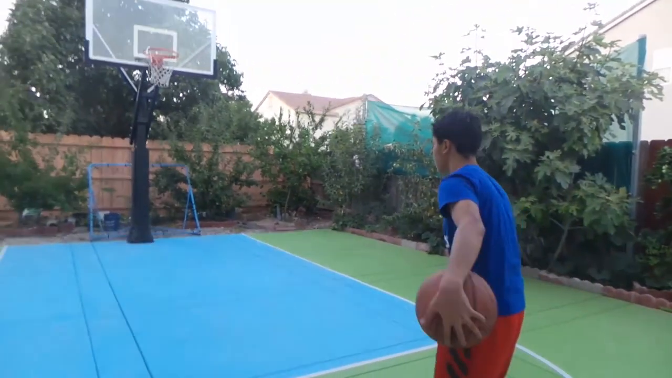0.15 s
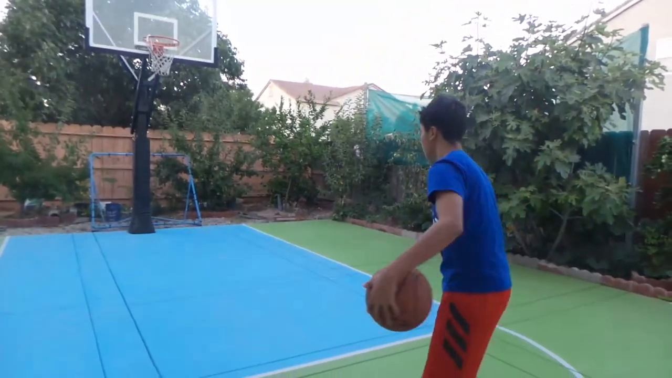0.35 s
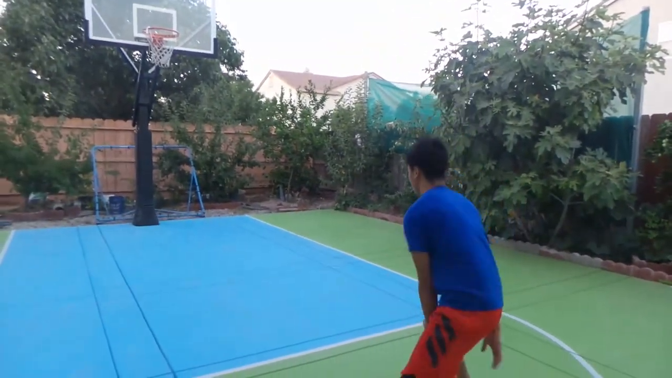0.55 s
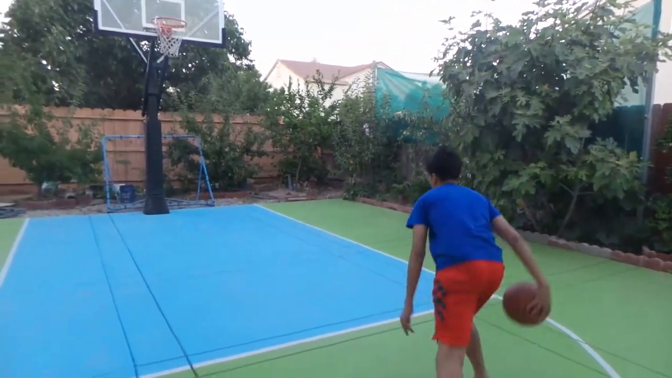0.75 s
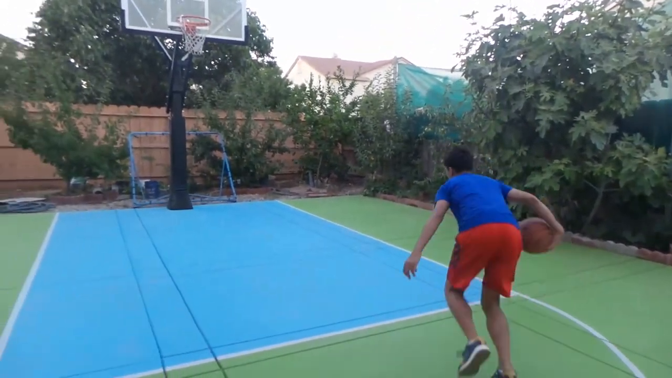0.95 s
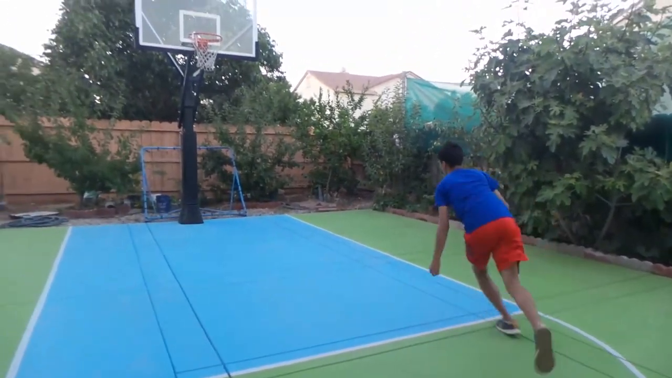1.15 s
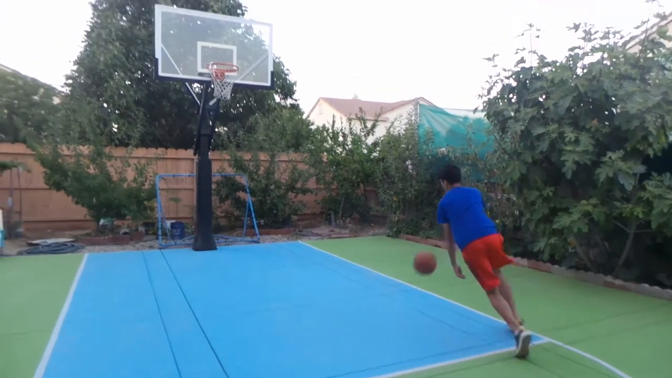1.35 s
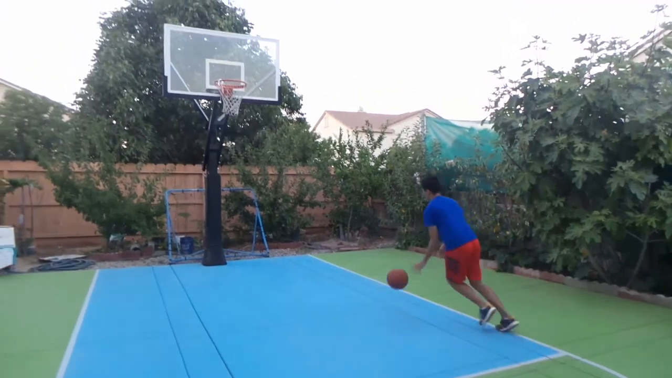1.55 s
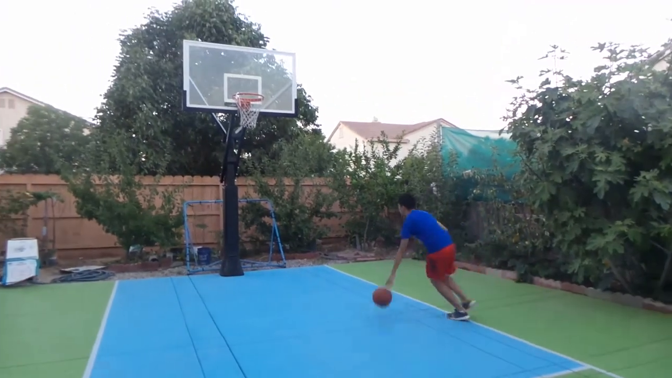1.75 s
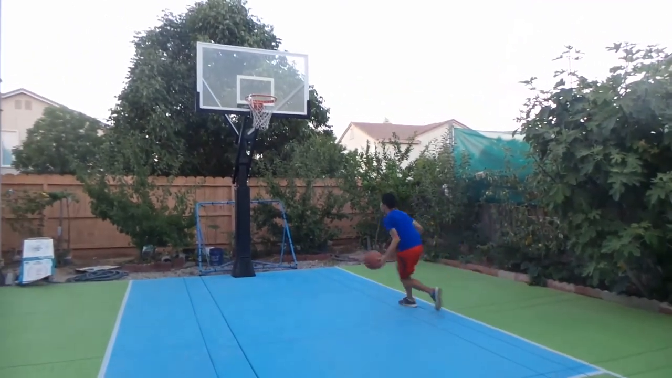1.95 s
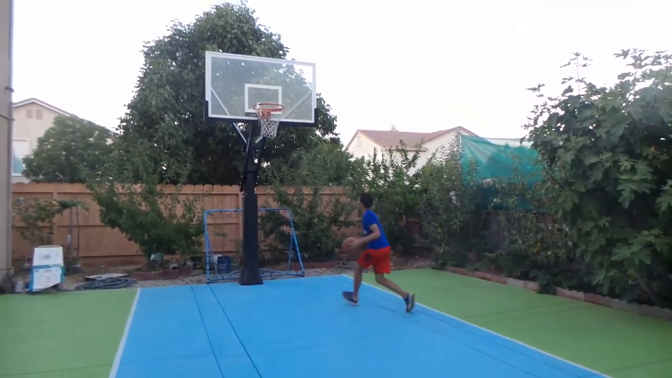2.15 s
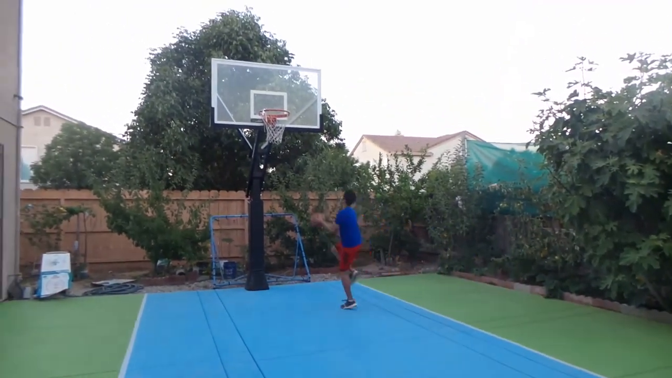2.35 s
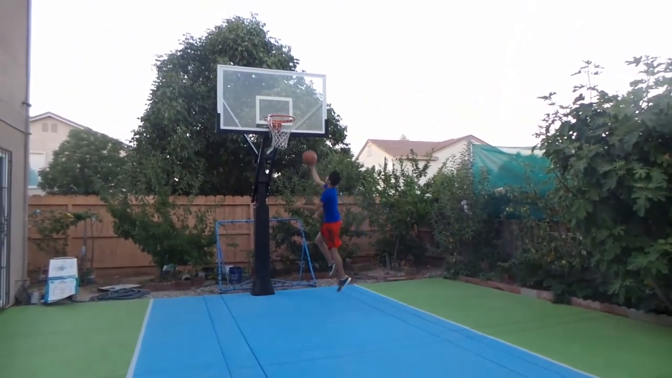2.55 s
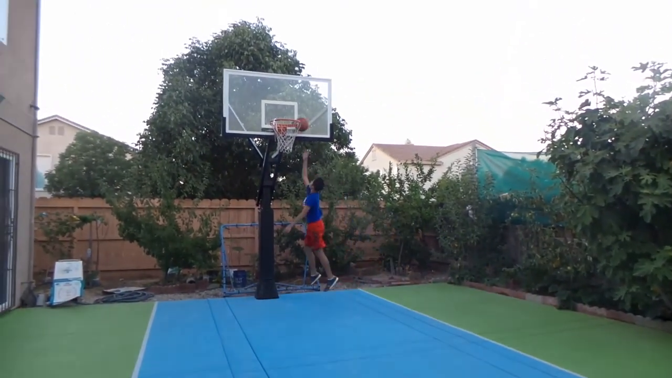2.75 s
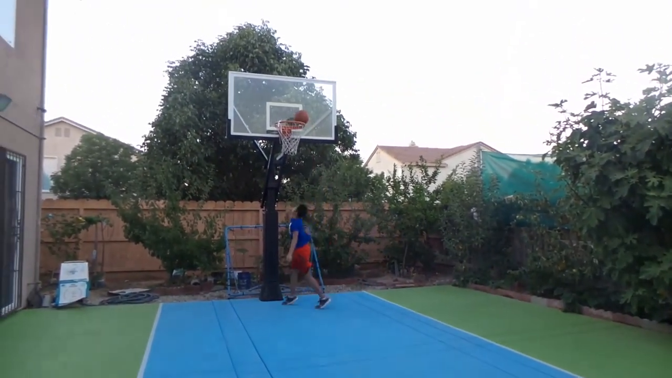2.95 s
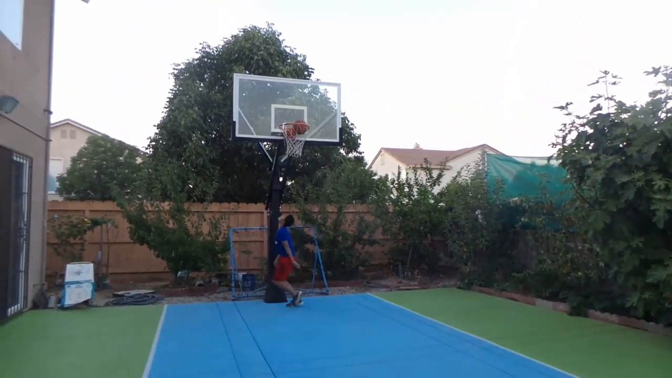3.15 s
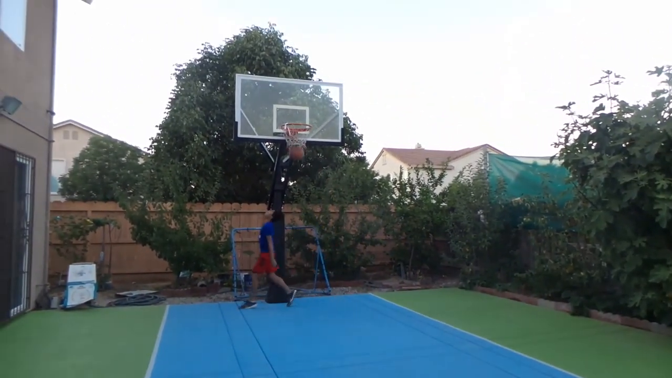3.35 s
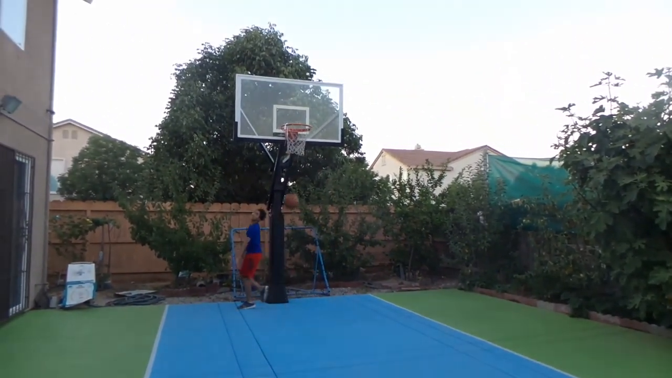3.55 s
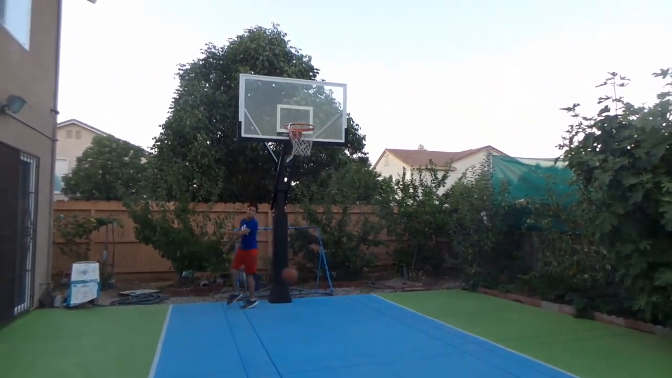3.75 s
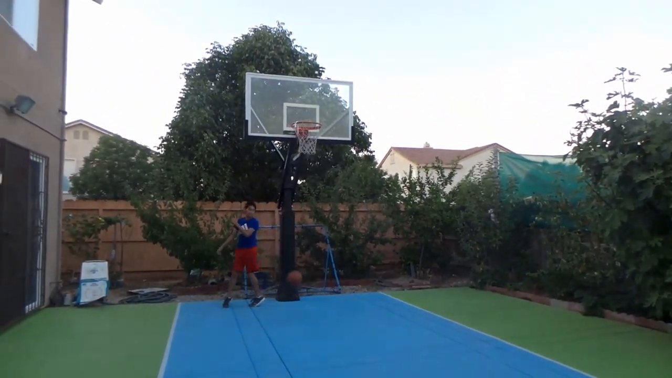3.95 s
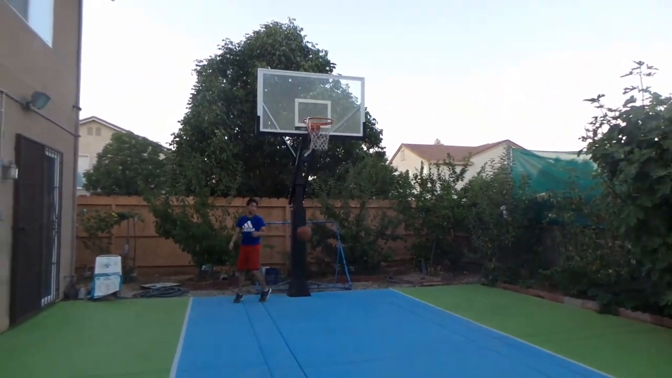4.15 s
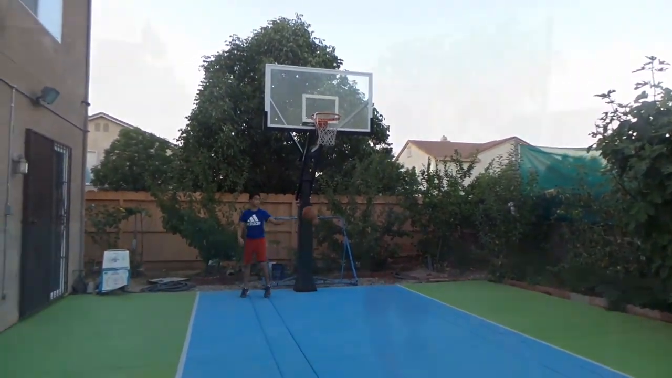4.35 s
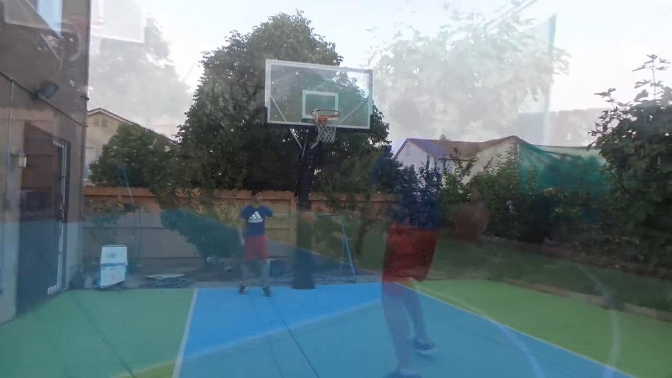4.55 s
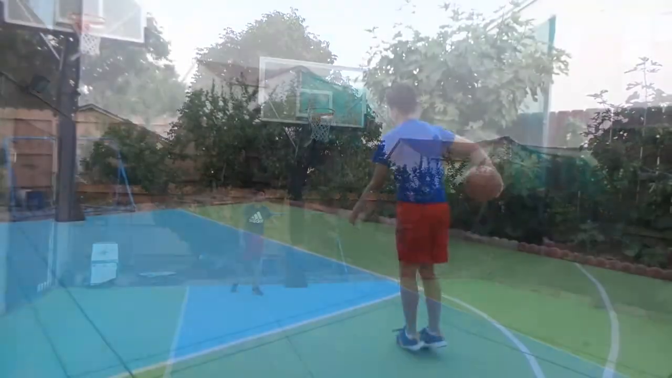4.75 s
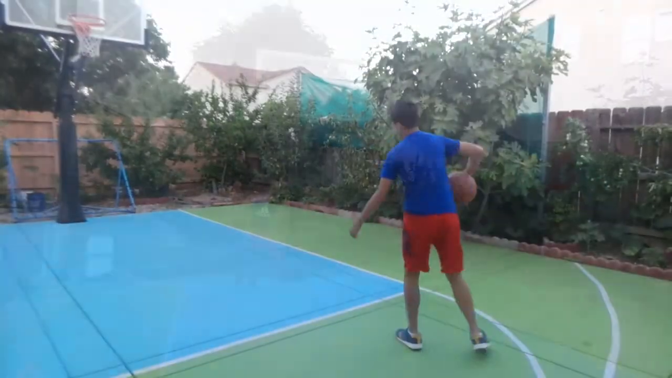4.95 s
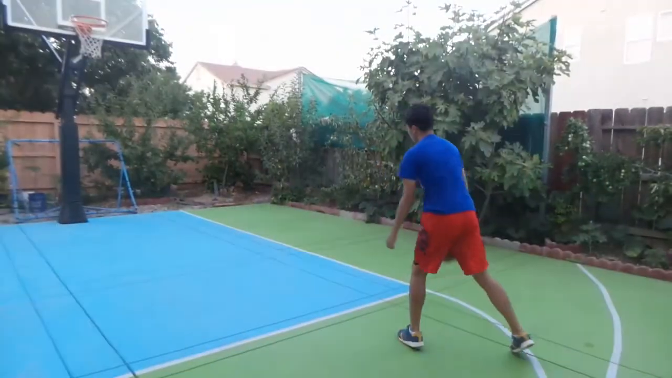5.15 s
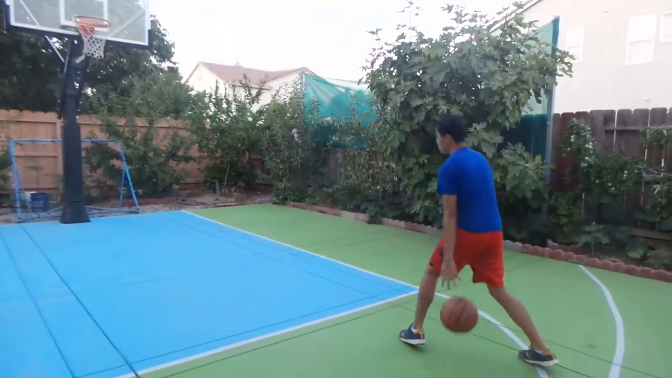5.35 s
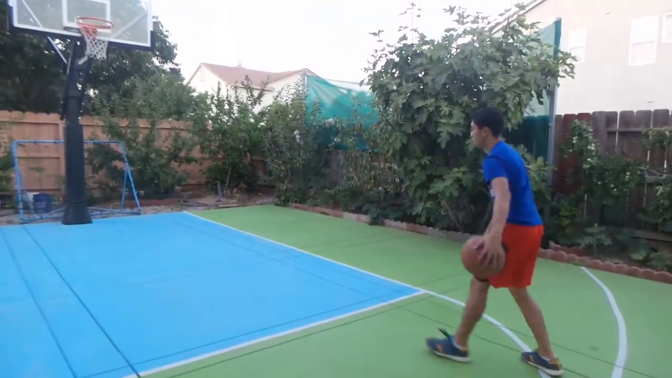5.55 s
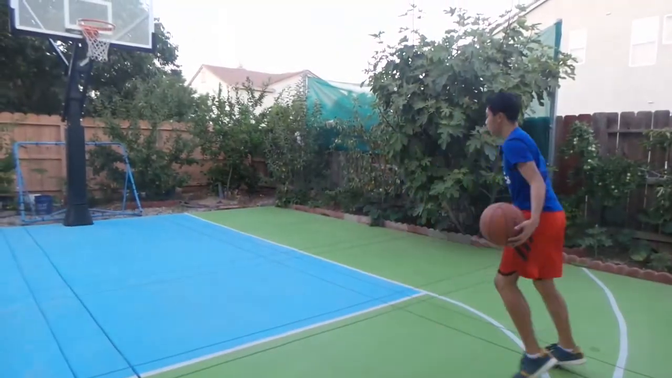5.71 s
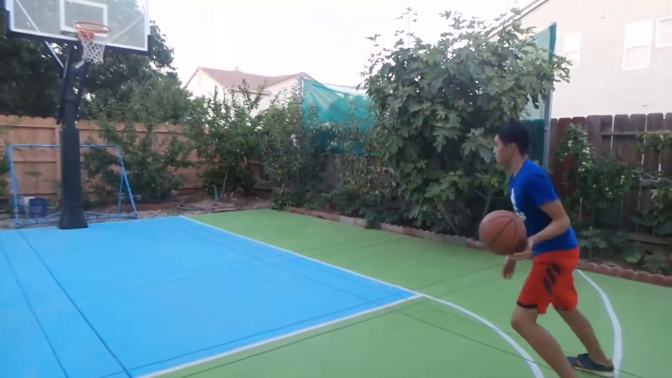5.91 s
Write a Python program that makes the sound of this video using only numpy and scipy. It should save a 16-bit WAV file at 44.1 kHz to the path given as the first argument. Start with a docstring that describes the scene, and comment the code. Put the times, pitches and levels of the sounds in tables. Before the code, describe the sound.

In a walled backyard, a palm slaps a basketball and a shoe scuffs, then three strong ringing bounces land unevenly among footsteps. A faint hoop rattle follows as a far car passes, then the ball drops with a crack and bounces weakly. Dribbling resumes with a moderate bounce and a very loud close one under a thin, high whistle. Traffic rumble and hiss continue on a small, nearly mono microphone.

```python
"""Suburban rumble, traffic and hiss, filtered noises, run throughout; blurred far whines come and go over them.
A palm slap and a shoe scuff open the dribbling on a concrete backyard court: each bounce is a crack, a thump,
a shell ring, a slap, grit and the ring of the air inside, returned by house wall and fences. Shoes land, one tick
follows a bounce, a far car goes by while the lay-up rattles on the hoop, the ball bounces on and is dribbled
again, and a thin whistle arches near the end. A small, nearly mono microphone listens."""
import sys
import numpy as np
from scipy import signal
from scipy.fft import rfft, irfft
from scipy.io import wavfile
from scipy.ndimage import uniform_filter1d

SR = 44100
rng = np.random.default_rng(int(sys.argv[2]) if len(sys.argv) > 2 else 0)


def transcribe(signal):
    """Save signal, clipped to [-1, 1], as a 16-bit WAV file at the path in sys.argv[1]."""
    frames = np.atleast_2d(signal).T
    limited = np.clip(frames, -1, 1)
    pcm = np.round(limited * 32767).astype(np.int16)
    wavfile.write(sys.argv[1], SR, pcm)


N = 268128  # samples in the scene


def undb(db):
    """Logarithmic level: decibels become an amplitude gain."""
    return 10 ** (np.asarray(db) / 20)


def clock(seconds):
    """Uniform sampling: times in seconds, from zero."""
    return np.arange(int(seconds * SR)) / SR


def unit(x):
    """Normalisation: scale to an rms of 1."""
    return x / np.sqrt(np.mean(x ** 2))


def bin_hz(size):
    """Discrete spectrum: bin frequencies, raised by 1 Hz to keep clear of zero."""
    return np.fft.rfftfreq(size, 1 / SR) + 1


def colour(x, points):
    """Spectral shaping: weight a noise by (Hz, dB) points joined on a log frequency axis, at rms 1."""
    hz, db = np.transpose(points)
    gain = undb(np.interp(np.log(bin_hz(len(x))), np.log(hz), db))
    return unit(irfft(rfft(x) * gain, len(x)))


def resonant(size, hz, q):
    """Simple resonance: noise through one tuned response of quality q, at rms 1."""
    f = bin_hz(size)
    response = 1 / (1 + 1j * q * (f / hz - hz / f))
    return unit(irfft(rfft(rng.standard_normal(size)) * response, size))


def butter(x, hz, kind, order):
    """Maximally flat filtering: a plain high-pass or low-pass."""
    return signal.sosfilt(signal.butter(order, hz, kind, fs=SR, output="sos"), x)


def fade(t, t60):
    """Exponential decay: a fall of 60 dB in t60 seconds."""
    return np.exp(-np.log(1000) * t / t60)


def ring(t, modes, detune):
    """Modal superposition: decaying sines, each slightly retuned at random on every blow."""
    out = 0
    for hz, db, t60 in modes:
        mode_hz = hz * (1 + detune * rng.standard_normal())
        out = out + undb(db) * fade(t, t60) * np.sin(2 * np.pi * mode_hz * t)
    return out


def walk(rate):
    """Slow random fluctuation: smoothed random steps, rate per second, with a spread near 1."""
    hold = int(SR / rate)
    steps = np.repeat(rng.standard_normal(N // hold + 1), hold)
    return 1.2 * uniform_filter1d(steps, hold)[:N]


def swell(peak_s, half_s):
    """Gaussian envelope: a smooth rise to 1 and fall, at 1/e after half_s."""
    return np.exp(-((np.arange(N) / SR - peak_s) / half_s) ** 2)


def grains(size, spread_db):
    """Granular noise: dense tiny clicks of unequal size."""
    size_db = spread_db * np.minimum(rng.exponential(size=size), np.pi)
    return rng.standard_normal(size) * undb(size_db)


def add(track, s, x):
    """Linear superposition: mix x into the track at time s."""
    i = max(int(s * SR), 0)
    track[i:i + len(x)] += x[:max(len(track) - i, 0)]


# spectra of the steady background: frequency_hz, relative_level_db (per Hz)
RUMBLE_SPECTRUM = [(13, -56), (22, -92), (43, 0.5), (85, 0), (108, 4.5), (145, -8), (216, 1.5), (260, -8.5),
                   (294, -5.5), (420, -17), (550, -39), (920, -120)]
TRAFFIC_SPECTRUM = [(210, -6.5), (350, -5), (397, -4), (546, -2.5), (770, -4), (958, -4), (1530, -11.5),
                    (1830, -17), (2600, -27.5), (3380, -33), (5720, -120)]
HISS_SPECTRUM = [(1290, -33), (2200, -3), (2930, -0.5), (4780, -5.5), (5110, -5), (15200, -8.5),
                 (16000, -13), (16500, -32)]
# the whole background swells while the player runs: peak_s, half_length_s, rise_db
BACKGROUND_SWELLS = [(1.7, 0.79, 6.5), (3.243, 0.3, 4.5), (5.715, 0.39, 5.5)]
RUMBLE_DB, TRAFFIC_DB, HISS_DB = -50.5, -55.5, -62  # before the swells
TRAFFIC_SWELL_SHARE = 0.83  # the traffic follows the swells only in part
CAR_PASSES_S, CAR_HALF_S, CAR_DB = 3.24, 0.71, -47  # a far car goes by


def neighbourhood():
    """Incoherent sources: wavering rumble and traffic under hiss; a car follows the inverse-distance law."""
    rise_db = sum(db * swell(s, half_s) for s, half_s, db in BACKGROUND_SWELLS)
    car = undb(CAR_DB) / np.hypot(1, (np.arange(N) / SR - CAR_PASSES_S) / CAR_HALF_S)
    road = np.hypot(undb(TRAFFIC_DB), car)  # powers add
    rumble_gain = undb(RUMBLE_DB + rise_db + walk(12))
    rumble = rumble_gain * colour(rng.standard_normal(N), RUMBLE_SPECTRUM)
    traffic_gain = road * undb(TRAFFIC_SWELL_SHARE * rise_db + walk(5.6))
    traffic = traffic_gain * colour(rng.standard_normal(N), TRAFFIC_SPECTRUM)
    hiss = undb(HISS_DB + rise_db) * colour(rng.standard_normal(N), HISS_SPECTRUM)
    return rumble + traffic + hiss


# a faint far whine comes and goes: peak_s, half_length_s, pitch_hz (at the peak), level_db
FAR_WHINES = [(.03, 0.15, 1980, -60.5), (.78, 0.18, 2070, -51.5), (1.11, 0.087, 1430, -52.5),
              (1.33, 0.18, 1910, -51.5), (2.29, 0.18, 2015, -51), (2.74, 0.12, 1270, -49)]
WHINE_SAG_HZ_PER_S = 350


def whine():
    """Random amplitude modulation: slow noise blurs each sagging tone into a narrow band."""
    t, out = np.arange(N) / SR, 0
    blur = colour(rng.standard_normal(N), [(60, 1.5), (140, -9), (400, -9.5), (1500, -70)])
    for s, half_s, hz, db in FAR_WHINES:
        phase = 2 * np.pi * np.cumsum(hz - WHINE_SAG_HZ_PER_S * (t - s)) / SR
        out = out + undb(db) * swell(s, half_s) * np.sqrt(2) * np.sin(phase)
    return blur * out


# diffuse sound of the yard: band_hz, relative_level_db, t60_s
YARD_BANDS = [(61.5, -2.5, 0.42), (126, -6, 0.68), (285, 2, 0.34), (696, -1.5, 0.38), (1350, -4.5, 0.49),
              (3000, -2, 0.34), (6960, -2, 0.25), (14000, -1.5, 0.2)]
# echoes off fence, shed and house: delay_s (varied by up to 15 % on each blow), level_db
YARD_ECHOES = [(.0075, -12.5), (0.0138, -17.5), (0.032, -19), (.048, -19)]


def yard(x):
    """Diffuse reverberation: fences and leaves scatter a blow's colour; far houses return a faint late share."""
    t = clock(1.2)
    f = bin_hz(len(t))
    # average the power of the blow over a band that widens with frequency
    energy = np.cumsum(np.abs(rfft(x, len(t))) ** 2)
    reach = 10 + .022 * f  # half the band, Hz
    band_energy = np.interp(f + reach, f, energy) - np.interp(f - reach, f, energy)
    power = band_energy * (f[1] - f[0]) / (2 * reach)
    noise = rfft(unit(grains(len(t), spread_db=1.5))) * np.sqrt(np.abs(power))
    hz, db, t60 = np.transpose(YARD_BANDS)
    tail = 0
    for share, band_db, band_t60 in zip(np.eye(len(hz)), db, t60):
        band = irfft(noise * np.interp(np.log(f), np.log(hz), share), len(t))
        late = undb(-23.5) * fade(t, 3.33 * band_t60)
        envelope = (1 - fade(t, 0.09)) * (fade(t, band_t60) + late)
        tail = tail + undb(band_db) * band * envelope / np.linalg.norm(envelope)
    for delay, echo_db in YARD_ECHOES:
        add(tail, delay * rng.uniform(.85, 1.15), undb(echo_db) * x)
    return butter(tail, hz=53.3, kind="highpass", order=4)


def pat(pop_hz, thud_db, snap_db, t60):
    """Cavity resonance: a soft blow's hollow pop of air, with a dull thud and a snap of skin or rubber."""
    t = clock(.25)
    pop = undb(-8.5) * resonant(len(t), pop_hz, q=3.3)
    pop = pop + undb(3.5) * ring(t, [(pop_hz, 0, .05), (0.466 * pop_hz, 0, .05)], detune=0.0043)
    thud_points = [(40, -15), (110, -3), (190, 0.0), (310, -1), (480, -4.5), (1200, -12), (6000, -63)]
    thud = undb(thud_db) * colour(rng.standard_normal(len(t)), thud_points)
    snap_points = [(300, -10), (1200, 8), (2700, 1), (5000, -11.5), (15000, -23)]
    snap = undb(snap_db) * colour(grains(len(t), spread_db=1.0), snap_points)
    return (pop + thud + snap) * fade(t, t60) * (1 - fade(t, 0.0042))


def in_yard(blows):
    """Direct and reverberant fields: each (time, dB, blow) with its own tail in the yard."""
    out = np.zeros(N)
    for s, db, x in blows:
        add(out, s, undb(db) * x)
        add(out, s, undb(db - 4.0) * yard(x))
    return out


# a palm meets the ball: start_s, level_db, cupped_air_hz, thud_db, snap_db
PALM_SLAPS = [(0.4717, -23.5, 802, -18, -10), (0.7084, -25, 1137, -14, 1), (1.4224, -30.5, 720, 7.5, -1),
              (1.9678, -14.5, 768, -0.5, -4.5)]
PALM_T60_S = 0.068


def palms():
    """Cupped-air resonance: palms slap the ball and trap air."""
    return in_yard([(s, db, pat(hz, thud_db, snap_db, PALM_T60_S)) for s, db, hz, thud_db, snap_db in PALM_SLAPS])


# soles, palms and net sliding: peak_s, rise_s, relative_level_db, rasp_db
SLIDES = [(0.48, .005, -39.5, -0.5), (0.729, 0.03, -37, -23), (0.872, 0.042, -46, 2.5),
          (1.16, 0.019, -35.5, -2), (1.439, 0.0097, -31, -5), (1.712, 0.015, -35, 2.5),
          (1.942, 0.015, -39, -21), (2.233, .019, -43.5, -1.5), (2.735, 0.0095, -46.5, -5),
          (3.031, 0.035, -39.5, 5.5), (3.411, 0.02, -39.5, 0), (4.823, 0.019, -42, -7),
          (5.626, 0.0084, -38, 2), (5.697, 0.036, -36, -3.5), (5.832, 0.02, -44.5, -15)]
SCUFF_FALL_S = 0.036  # to 1/e


def scuffs():
    """Sliding friction: fine bright grains over a coarser rasp, swelling and dying away."""
    t, bright, coarse = np.arange(N) / SR, 0, 0
    for s, rise, db, rasp_db in SLIDES:
        before, after = np.minimum(t - s, 0), np.maximum(t - s, 0)
        pressure = undb(db) * np.exp(-(before / rise) ** 2 - after / SCUFF_FALL_S)
        bright = bright + pressure
        coarse = coarse + undb(rasp_db) * pressure
    fine_points = [(500, -40), (2000, -20), (4500, -1.0), (8000, 1.5), (13000, 0.0), (16000, -4.0)]
    fine = colour(grains(N, spread_db=5.0), fine_points)
    rasp_points = [(100, -14), (400, -13.0), (1000, -6.5), (2300, -6.5), (5000, -10), (12000, -42)]
    rasp = colour(grains(N, spread_db=4.0), rasp_points)
    return undb(-2) * (bright * fine + coarse * rasp)


# modes of the air inside the ball: mode_hz, relative_level_db, t60_s
AIR_MODES = [(950, 9, 0.2), (1135, 11.5, 0.25), (1207, -9, 0.54), (1280, 11.5, 0.16), (1383, 10, 0.28),
             (1700, -1, 0.39), (1840, -11, .35), (1925, 17, 0.1), (1960, -5, .6), (2280, 7, 0.28),
             (2930, -11, 1), (3320, -31, 0.38), (3860, -8, .25), (4880, 2, 0.13)]
# modes of the flexing rubber shell: multiple_of_shell_hz, relative_level_db, t60_s
SHELL_MODES = [(.74, -32, 0.04), (0.999, 5, 0.068), (1.31, -6.5, 0.019), (1.75, -11.5, 0.028),
               (2.2, -6.5, 0.052)]
# grit crushed under the ball: frequency_hz, relative_level_db (per Hz)
GRIT_SPECTRUM = [(150, 22.5), (500, 9), (1000, 5.5), (2200, 2), (3500, 0.5), (5500, -2), (9000, -4.5),
                 (14000, -8.5), (17000, -25)]


def bounce(thump_hz, thump_db, shell_hz, shell_db, slap_hz, slap_db, grit_db, air_db):
    """Impact excitation: one blow on concrete drives the whole ball, its shell, its air and the grit."""
    t = clock(.6)
    # air squeezed from the closing gap gives a single sharp spike
    u = t / .000045
    crack = -1.3 * u * np.exp(1 - u)
    # the whole ball flattens and springs back
    thump_envelope = (1 - fade(t, 0.014)) * fade(t, 0.064)
    thump = -undb(-1.5 + thump_db) * np.sin(2 * np.pi * thump_hz * t) * thump_envelope
    shell_modes = [(shell_hz * k, db, t60) for k, db, t60 in SHELL_MODES]
    shell = undb(-18.5 + shell_db) * ring(t, shell_modes, detune=0.03)
    # rubber slaps the floor with two brief resonances and crushes grit while the contact spreads
    contact = 1 - fade(t, .006)
    rubber = resonant(len(t), slap_hz, q=6.1) * fade(t, 0.12)
    rubber = rubber + ring(t, [(slap_hz, 4, .03), (1.33 * slap_hz, 5, .028)], detune=0.029)
    slap = undb(-16.5 + slap_db) * rubber
    grit = undb(-10.5 + grit_db) * colour(grains(len(t), spread_db=5.0), GRIT_SPECTRUM) * fade(t, 0.055)
    air = undb(-39.5 + air_db) * ring(t, AIR_MODES, detune=0.00087)
    # so small a body radiates little deep bass
    return butter(crack + thump + shell + contact * (slap + grit + air), hz=56.8, kind="highpass", order=5)


# ball on concrete: start_s, level_db, distance_m, thump_hz, relative thump_db, shell_hz, relative shell_db,
# slap_hz, relative slap_db, wall_echo_delay_s
BALL_BOUNCES = [(0.6024, -3.5, 6.7, 128, -3.5, 297, -0.5, 620, -7.5, 0.025),
                (1.4625, -4, 4.1, 100.4, -0.5, 280.5, 10, 1273, 2.5, .0185),
                (1.8277, 0, 7.2, 101, -2.5, 270, 1.5, 754, -12, .019),
                (3.8900, -4.5, 10.54, 114, -5, 243.5, 1, 1140, 5, .025),
                (4.2660, -22.5, 10.7, 135, -0.5, 253, -29, 1220, -1, .014),
                (4.9223, -9, 2.9, 129, -10, 277, -6.5, 1260, -11, 0.021),
                (5.2990, -1, 2, 118, -2.5, 207.5, -1, 1780, 0, 0.024)]
# the farther the ball, the more of the yard and of the crunch is heard beside the direct thump
NEAR_YARD_DB, YARD_DB_PER_M = -5, 0.8442
NEAR_GRIT_DB, GRIT_DB_PER_M = -.5, 0.6626
AIR_DB = 1  # relative level of the air ring
FENCE_S, FENCE_DB, FENCE_HZ = .009, -9, 338  # the nearest fence returns the bass at once


def dribbling():
    """Specular reflection: every bounce with dull echoes off fence and house wall, and its tail in the yard."""
    out = np.zeros(N)
    for s, db, metres, *blow, wall_s in BALL_BOUNCES:
        x = undb(db) * bounce(*blow, NEAR_GRIT_DB + GRIT_DB_PER_M * metres, AIR_DB)
        add(x, FENCE_S, undb(FENCE_DB) * butter(x, hz=FENCE_HZ, kind="lowpass", order=1))
        add(out, s, x)
        add(out, s + wall_s, undb(-8.0) * butter(x, hz=1430, kind="lowpass", order=1))
        add(out, s, undb(NEAR_YARD_DB + YARD_DB_PER_M * metres) * yard(x))
    return out


# a shoe lands: start_s, level_db, trapped_air_hz, t60_s
SHOE_LANDINGS = [(1.155, -30.5, 690, 0.2), (1.652, -32.5, 686, 0.15), (2.2633, -30.5, 576, 0.28),
                 (2.756, -39, 650, 0.16), (3.374, -32, 604, .07), (5.238, -42.5, 880, 0.07),
                 (5.801, -36.5, 544, 0.045), (5.9345, -31, 595, 0.038)]
STEP_THUD_DB, STEP_SNAP_DB = 0, -7.5


def footsteps():
    """Trapped-air resonance: shoes land and press air beneath them."""
    return in_yard([(s, db, pat(hz, STEP_THUD_DB, STEP_SNAP_DB, t60)) for s, db, hz, t60 in SHOE_LANDINGS])


TICK_S, TICK_DB = 1.8736, -15  # just after a bounce


def tick():
    """Broadband transient: a lone bright click, heavily damped."""
    out, t = np.zeros(N), clock(.03)
    add(out, TICK_S, undb(TICK_DB) * resonant(len(t), hz=4000, q=0.52) * fade(t, 0.005))
    return out


HOOP_S, HOOP_GAP_S, HOOP_DB, HOOP_HZ = 2.982, .0275, -35.5, 620
HOOP_THUD_DB, HOOP_SNAP_DB, HOOP_T60_S = 9.5, -4, 0.12


def hoop_rattle():
    """Repeated impact: the lay-up touches the hoop three times, evenly spaced."""
    times = HOOP_S + HOOP_GAP_S * np.arange(3)
    return in_yard([(s, HOOP_DB, pat(HOOP_HZ, HOOP_THUD_DB, HOOP_SNAP_DB, HOOP_T60_S)) for s in times])


# strands of the whistle: multiple_of_pitch, peak_s, half_length_s, level_db (before the flutter)
WHISTLE_STRANDS = [(1, 5.23, .21, -50), (.87, 5.18, .2, -59), (1.07, 5.21, .06, -54),
                   (1.33, 5.48, .05, -58)]
WHISTLE_TOP_S, WHISTLE_TOP_HZ, WHISTLE_ARCH_HZ_PER_S2 = 5.205, 12670, 30000


def whistle():
    """Frequency modulation: a thin fluttering tone arches up and down, with weaker strands beside it."""
    t, out = np.arange(N) / SR, 0
    hz = np.maximum(WHISTLE_TOP_HZ - WHISTLE_ARCH_HZ_PER_S2 * (t - WHISTLE_TOP_S) ** 2, 0)
    for multiple, s, half_s, db in WHISTLE_STRANDS:
        flutter = undb(3 * walk(45)) * (1 + .45 * walk(170))
        waver = 1 + .0055 * walk(900) + .006 * walk(25)
        phase = 2 * np.pi * np.cumsum(multiple * hz * waver) / SR
        out = out + undb(db) * swell(s, half_s) * flutter * np.sin(phase)
    return out


def scene():
    """Superposition: all sources add; a faint difference slightly widens two nearly equal channels."""
    background = neighbourhood() + whine()
    player = palms() + scuffs() + footsteps()
    ball = dribbling() + tick() + hoop_rattle()
    mid = background + player + ball + whistle()
    side = undb(-42.5) * np.diff(mid, prepend=0)  # treble-weighted
    return np.array([mid + side, mid - side])


TOP_HZ = 15900


def record(dry):
    """Band limiting and saturation: the microphone thins deep bass, rounds loud peaks and cuts the top."""
    x = butter(dry, hz=28, kind="highpass", order=2)
    x = x / (1 + (x / .88) ** 4) ** .25
    return signal.sosfilt(signal.ellip(8, .2, 70, TOP_HZ, fs=SR, output="sos"), x)


dry = scene()
out = record(dry)
transcribe(out)
```